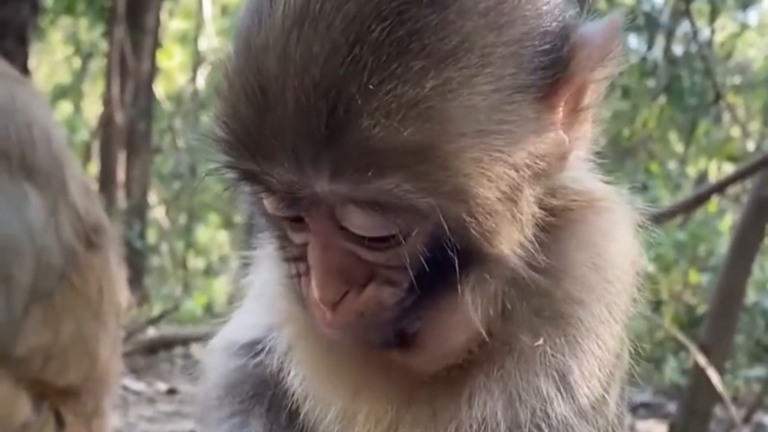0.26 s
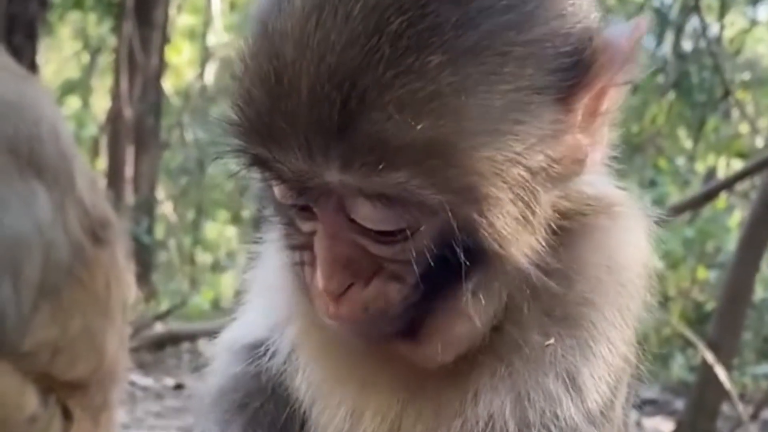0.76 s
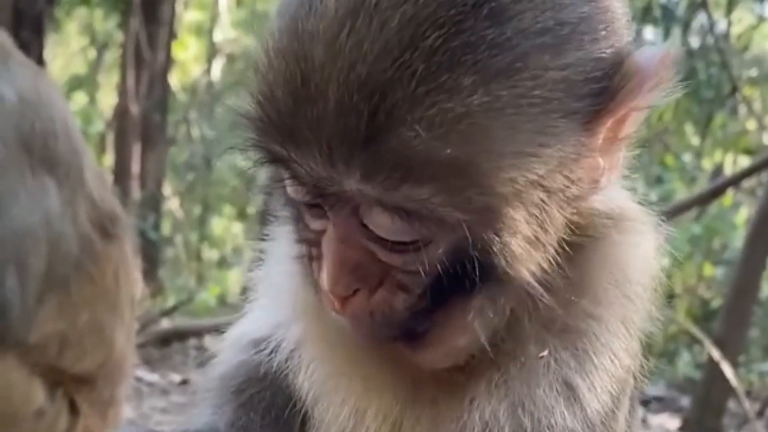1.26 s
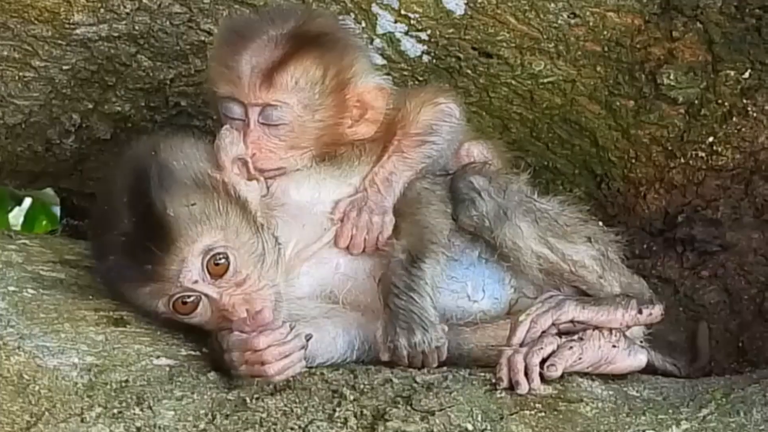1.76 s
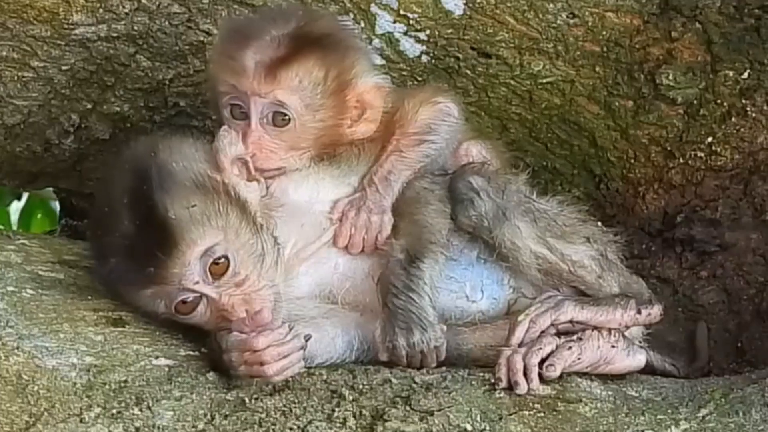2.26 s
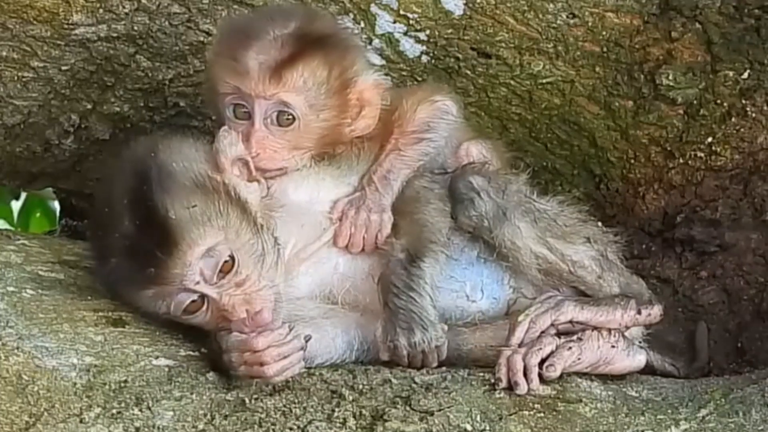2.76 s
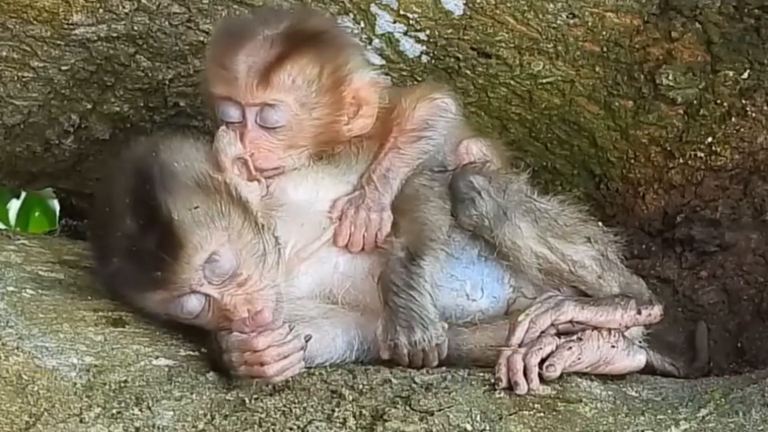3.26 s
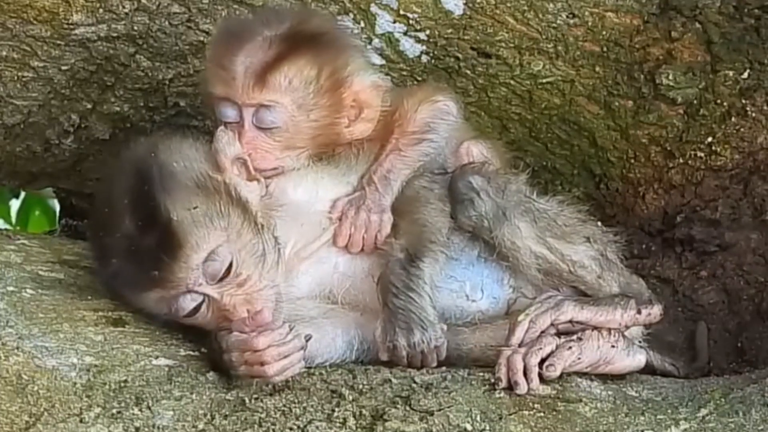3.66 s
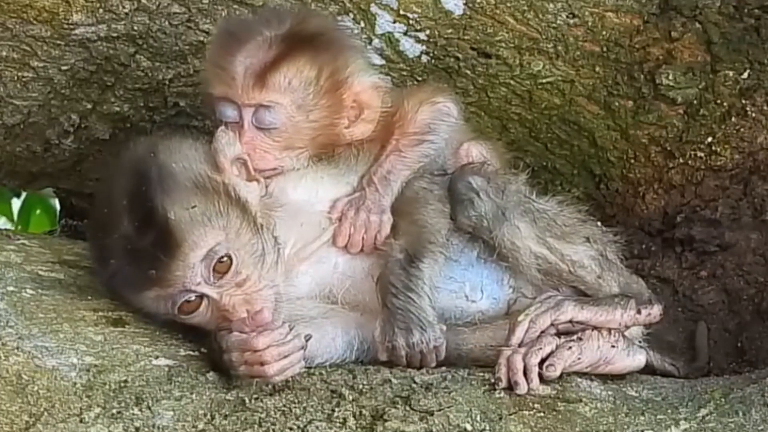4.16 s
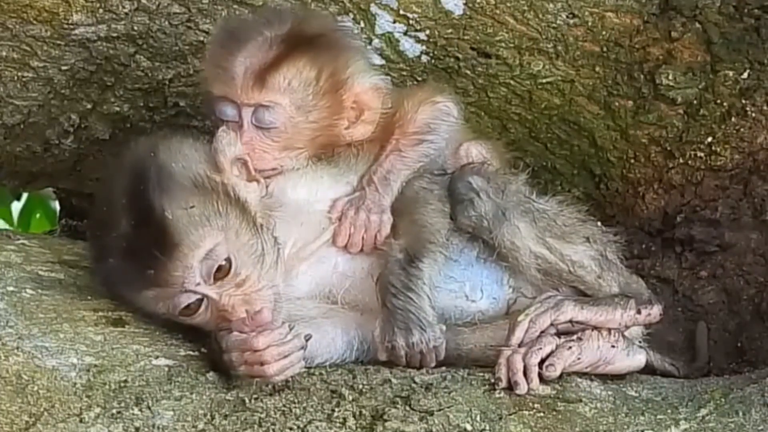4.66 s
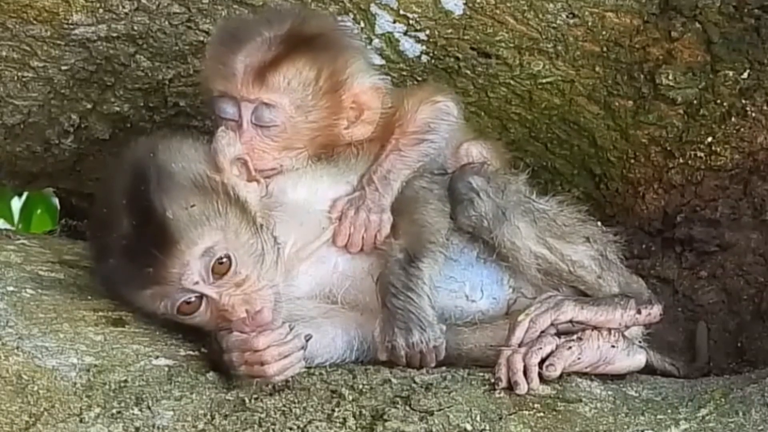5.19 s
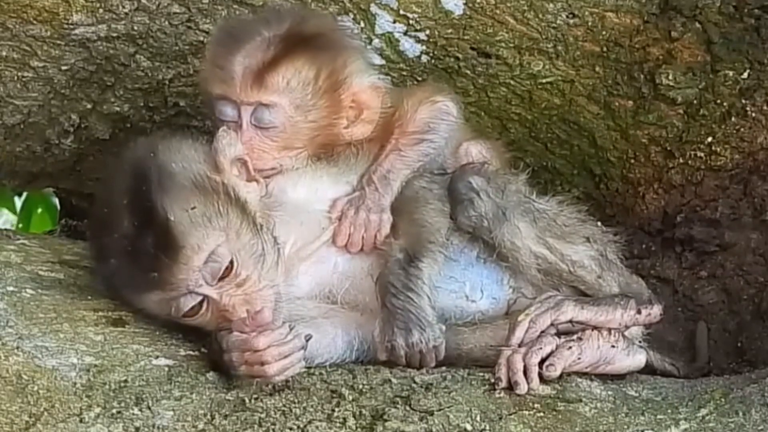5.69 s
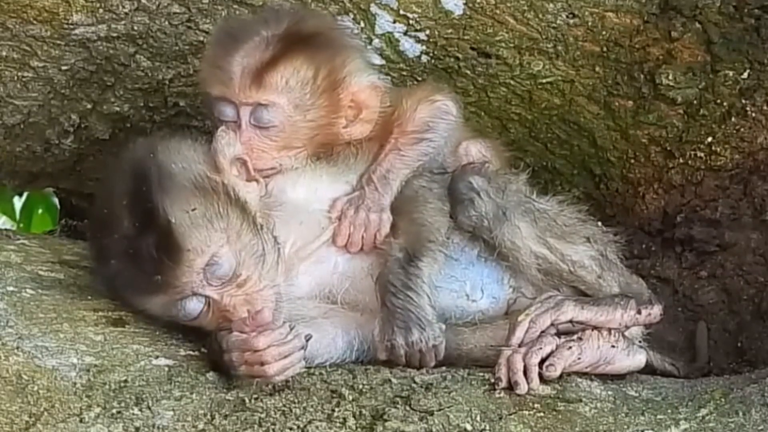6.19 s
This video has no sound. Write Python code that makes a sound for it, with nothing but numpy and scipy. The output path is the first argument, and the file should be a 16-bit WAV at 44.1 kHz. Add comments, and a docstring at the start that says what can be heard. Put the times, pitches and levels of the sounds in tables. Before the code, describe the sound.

Outdoors, piercing baby-monkey chatter comes in five bursts, most ending in a cracked, sinking squeal and a soft huff, with brief echoes.

```python
"""Among trees and rocks a young monkey calls close by: a cry, then five runs of shrill pips.
The first four runs rise into another falling, fluttering cry; cries crack and end in a soft huff.
The voice is a stack of harmonics from unsteady vocal folds, coloured by throat and mouth; huffs are
shaped noise. Noise echoes ring briefly, and low rumble swells around the calls. Underneath: a two-tone
far engine, noise rustle and hiss, a shrill wash, one faint falling whistle, a tick, a bump and a scuff."""
import sys
import numpy as np
from scipy import signal
from scipy.fft import rfft, irfft
from scipy.io import wavfile
from scipy.ndimage import uniform_filter1d, minimum_filter1d, map_coordinates

SR = 44100
rng = np.random.default_rng(int(sys.argv[2]) if len(sys.argv) > 2 else 0)


def waveform_to_disk(signal):
    """Save audio, clipped to [-1, 1], as 16-bit WAV at the path in sys.argv[1]."""
    frames = np.transpose(np.atleast_2d(signal))
    scaled = np.clip(frames, -1, 1) * 32767
    samples = np.round(scaled).astype(np.int16)
    wavfile.write(sys.argv[1], SR, samples)


N = 283563
TIME = np.arange(N) / SR
TOP_HZ = 16200  # upper edge of the voice and of the recorder

# bell-shaped swells of low rumble around the calls: (time [s], half width [s], level [dB])
RUMBLE_SWELLS = [(.07, .03, -40.5), (1.05, 0.13, -33), (2.63, 0.21, -35.5), (3.74, 0.058, -35.5),
                 (3.98, 0.24, -33.5), (4.38, .08, -43), (4.93, 0.11, -39), (5.66, 0.3, -43),
                 (6.37, 0.097, -40.5)]
# colour of that rumble: (frequency [Hz], level [dB])
RUMBLE_COLOUR = [(10, -28.5), (20, 6), (35, -9), (55, -13), (90, -26), (200, -34), (500, -78)]
# held levels of the surroundings:
# (start [s], low rustle [dB], high hiss [dB], echo send [dB], low rumble [dB])
BACKGROUND_LEVELS = [(0, -63, -62, 0, -52), (1.771, -58.5, -54, 0, -51.5), (3.62, -54.5, -53.5, 4, -45.5),
                     (4.85, -55.5, -53.5, 8.5, -49.5), (5.9, -56.5, -54, 2.5, -48)]
# bell-shaped swells of low rustle: (time [s], half width [s], level [dB])
RUSTLE_SWELLS = [(1.15, .09, -51), (4.0, 0.12, -44.5), (4.64, 0.17, -48)]
# colours of rustle and hiss: (frequency [Hz], level [dB])
RUSTLE_COLOUR = [(60, -0.5), (150, -1.5), (300, -1), (700, 0), (1100, -2), (1700, -14.5), (3000, -11),
                 (6000, -76.5)]
HISS_COLOUR = [(800, 0), (2000, 6.5), (2800, 5.5), (4500, 3), (6500, 4.5), (9000, -3), (12000, -6.5),
               (16000, -10.5)]
# far engine: (time [s], firing rate [Hz], level [dB])
ENGINE_CURVE = [(0.05, 100, -58), (.55, 98.3, -50), (.9, 89, -53.5), (1.7, 99, -51.5), (2.45, 98.5, -51.5),
                (3.6, 89.3, -49), (3.95, 88, -66), (4.75, 92, -70), (4.95, 99, -51), (5.6, 108, -66)]
# throat colour: (frequency [Hz], level [dB])
THROAT_COLOUR = [(700, 1.5), (1500, 2), (2250, 0.5), (2550, 2.5), (2800, 4), (3400, 15.5), (4200, 4),
                 (5500, 6), (6300, 2), (7500, 7.5), (10000, 1), (11500, -2), (13000, -8), (16000, -31)]
# colour of the snap that starts a note: (frequency [Hz], level [dB])
SNAP_COLOUR = [(300, -28.5), (750, 8), (1700, -36.5), (2500, -7.5), (3200, 8.5), (4300, -13), (7300, 12),
               (10000, 1), (16000, -31)]
# colour of air rushing through the mouth: (frequency [Hz], level [dB])
BREATH_COLOUR = [(100, 18), (300, 2.5), (750, 10), (1100, 3), (1800, -1.5), (3300, 10), (4600, -12),
                 (7500, 0.5), (11000, 14), (16000, -45)]
# long cries that hold their pitch, then sink and flutter:
# (time [s], length [s], held pitch [Hz], hold [s], last pitch [Hz], sinking time [s], level [dB],
#  mouth resonance [Hz], brightness [dB], fundamental [dB], flutter [0-1], flutter rate [Hz])
CRY_NOTES = [(0.0, 0.042, 2834, 0.00068, 2734, 0.031, -13, 7450, -7, -3, 0.78, 145.6),
             (1.116, 0.088, 2844, 0.0046, 2600, 0.084, -14.5, 7160, -4, -4, 0.68, 143.5),
             (2.717, 0.11, 2847, .042, 2665, 0.0095, -8, 7230, -2, -5, 0.42, 195),
             (4.066, .179, 2549, .095, 2180, .034, -20, 8950, 4.5, 2.5, .12, 142.7),
             (5.587, 0.12, 2312, 0.018, 2250, 0.015, -21.5, 8440, -0.5, -1, .05, 146)]
# cracks that end the cries: (time [s], pitch [Hz], level [dB], hoarseness [0-1])
CRACK_NOTES = [(.042, 3470, -13.5, 0.19), (1.199, 3263, -12.5, 0), (2.828, 3320, -10.5, 0.02),
               (4.248, 2214, -22.5, 0.83), (5.709, 2794, -20.5, 0.15)]
# soft huffs: (time [s], decay [s], level [dB])
HUFF_PUFFS = [(.054, 0.017, -29), (1.212, 0.018, -30), (2.351, 0.012, -34.5), (2.839, 0.025, -33.5),
              (3.925, 0.03, -35), (3.985, 0.073, -46), (4.257, 0.027, -46), (5.716, 0.0093, -26.5)]
# huff colour: (frequency [Hz], level [dB])
HUFF_COLOUR = [(150, -32.5), (480, -16.5), (640, 4.5), (820, -7.5), (1080, -4), (1500, -20.5), (3500, -17),
               (8000, -18.5), (15000, -33)]
# bell-shaped swells of a shrill wash from the trees: (time [s], half width [s], level [dB])
WASH_SWELLS = [(.42, 0.23, -58.5), (1.55, 0.21, -59)]
# short pips: (time [s], length [s], pitch [Hz], level [dB], hoarseness [0-1])
PIP_NOTES = [ (0.619, 0.023, 2490, -32.5, 0.12), (.679, 0.019, 2650, -28, 0.08),
             (0.744, 0.018, 2707, -20, 0), (.802, 0.018, 2658, -15, 0), (.862, .017, 2692, -14, 0),
             (0.92, 0.017, 2790, -13, 0.01), (0.976, 0.017, 2833, -11.5, 0), (1.031, .019, 2826, -13, 0.08),
             (1.082, .019, 2800, -10, 0.08), (2.157, 0.012, 2190, -35.5, 0.67),
             (2.216, 0.018, 2480, -27.5, 0.16), (2.281, 0.018, 2270, -21.5, 0.15),
             (2.407, .021, 2466, -17.5, 0.07), (2.465, 0.018, 2480, -13.5, 0),
             (2.52, .018, 2590, -10.5, .1), (2.58, .017, 2660, -10.5, 0.08), (2.632, 0.019, 2794, -7, 0.02),
             (2.683, 0.015, 2695, -7, 0.16), (3.669, 0.019, 1383, -23.5, 0.63),
             (3.728, 0.016, 1935, -24.5, 0.47), (3.797, 0.011, 1978, -23, 0.42),
             (3.847, 0.021, 2295, -16.5, 0.05), (3.908, 0.012, 2360, -8, 0),
             (3.956, 0.023, 2452, -17.5, 0.1), (4.004, .021, 2443, -19.5, .02),
             (4.032, 0.022, 2490, -19, 0.06), (4.056, 0.0113, 2530, -22.5, 0.42),
             (4.968, 0.015, 1980, -47.5, 1), (5.037, 0.032, 2150, -44.5, 0.15),
             (5.094, .022, 1956, -35, 0.65), (5.156, 0.022, 1706, -36, 0.9),
             (5.212, 0.025, 2120, -34.5, .75), (5.267, 0.026, 2154, -33, 0.8),
             (5.322, 0.02, 2280, -31.5, 0.6), (5.379, 0.0193, 2305, -30, 0.65),
             (5.422, 0.022, 2300, -32, 0.48), (5.461, .027, 2264, -30, 0.27),
             (5.508, 0.0237, 2300, -24.5, 0.23), (5.549, 0.026, 2266, -22, 0.22),
             (6.003, 0.029, 2480, -37.5, 0.37), (6.072, 0.021, 2433, -24, .6),
             (6.128, 0.021, 2517, -21, 0.26), (6.186, 0.018, 2600, -19, 0.14),
             (6.242, 0.023, 2612, -18, 0.15), (6.301, .023, 2655, -20, 0.15),
             (6.355, .024, 2715, -18.5, 0.14), (6.404, 0.017, 2688, -5, 0.15)]
# runs of pips, with pairs from the run's start to its end, or to the open mouth:
# (start [s], opening time [s], mouth resonance pair [Hz], brightness pair [dB],
#  pitch glide pair [share], fundamental [dB], flutter added at the last pip [0-1])
PIP_RUNS = [(0.61, 0.32, (3130, 6520), (2.8, 0), (-0.049, 0.0), -0.5, 0.67), (2.17, 0.17, (4900, 6970),
            (2.7, 2.9), (-0.033, 0.077), -5, .02), (3.66, 0.28, (3800, 7500), (-3.5, 3.8), (-0.018, 0.013),
            1, 0.1), (5.08, 0.29, (2600, 5960), (-36, 6.8), (0.026, -.005), -2, 0.1),
            (6.0, 0.19, (2250, 6860), (-15, -3), (-0.056, 0.013), -3.5, 0)]
# colours of wash, tick, scuff and the two parts of the echo: (frequency [Hz], level [dB])
WASH_COLOUR = [(1800, -48.0), (2600, -19), (3100, -1), (3900, -4.5), (4600, -35.5), (6000, -46.5)]
TICK_COLOUR = [(100, -8), (1000, 3), (5000, -15), (16000, -33)]
SCUFF_COLOUR = [(120, -25), (300, -7.5), (550, -4), (1200, -30), (8000, -27), (16000, -32)]
ECHO_MID_COLOUR = [(200, -29.5), (3000, -8.5), (6000, -5.5), (8500, -5.5), (12000, -4.5), (16000, -58.5)]
ECHO_SIDE_COLOUR = [(200, 0.5), (3000, -36.5), (8500, -32.5), (12500, 5), (16000, 57)]

SCOOP, SCOOP_S = 0.03, 0.009  # a cry starts this share flat and slides up
MOUTH_FOLLOW, FLUTTER_ONSET_S = 1.37, 0.0037  # the mouth closes as a power of the sinking pitch
CRACK_S, CRACK_GLIDE, CRACK_MOUTH_HZ, CRACK_BRIGHT_DB, CRACK_FLUTTER = 0.0092, 0.068, 6500, 5.5, 0.42
STEADY_FLUTTER, FLUTTER_RISE_S = 0.098, 0.04  # extra flutter gathers towards a run's last pip
WHISTLE_AT_S, WHISTLE_HALF_S, WHISTLE_DB = 1.55, 0.18, -60  # centre, half width, level before wobble
WHISTLE_HZ, WHISTLE_FALL_HZ_PER_S = 2300, 3200  # pitch at the centre, and its fall


def undb(db):
    """Decibels to gain."""
    return 10 ** (np.asarray(db) / 20)


def between(pair, share):
    """The value a share of the way from the first of a pair to the second."""
    return pair[0] + share * (pair[1] - pair[0])


def colour_db(points, hz):
    """A spectrum read on a log-frequency axis."""
    f, db = np.transpose(points)
    return np.interp(np.log(np.maximum(hz, 1)), np.log(f), db)


def noise(points, size=N):
    """Noise of rms 1 with the given colour."""
    gain = undb(colour_db(points, np.fft.rfftfreq(size, 1 / SR)))
    y = irfft(rfft(rng.standard_normal(size)) * gain, size)
    return y / y.std()


def walk(rate, size=N):
    """Smooth chance, with the given number of random knots a second."""
    knots = rng.standard_normal(int(size / SR * rate) + 4)
    return map_coordinates(knots, [np.arange(size) * rate / SR + 1], order=2)


def add(track, s, sound):
    """Mix a sound into a track at time s."""
    i = max(int(s * SR), 0)
    track[i:i + len(sound)] += sound[:max(N - i, 0)]


def swells(table):
    """The gain of bell-shaped swells, summed by power."""
    power = 0
    for s, half, db in table:
        power = power + (undb(db) * np.exp(-((TIME - s) / half) ** 2)) ** 2
    return np.sqrt(power)


def background_levels(blend_s=0.15):
    """Rustle, hiss, echo and rumble levels in dB, each held through its stretch and blended into the next."""
    starts, *columns = np.transpose(BACKGROUND_LEVELS)
    stretch = np.searchsorted(starts[1:], TIME)
    return [uniform_filter1d(c[stretch], int(blend_s * SR) + 1) for c in columns]


def rumble():
    """Low coloured noise: a steady low rumble and its swells add by power."""
    *_, calm_db = background_levels()
    return np.hypot(undb(calm_db), swells(RUMBLE_SWELLS)) * noise(RUMBLE_COLOUR + [(2000, -73)])


def outdoors(side=0.2, crackle_db=2.0, grain_db=3):
    """An uneven low rustle with grainy swells and a smooth high hiss, nearly the same on both sides."""
    low_db, high_db, *_ = background_levels()
    grainy = swells(RUSTLE_SWELLS) * undb(grain_db * walk(90))
    low = np.hypot(undb(low_db), grainy) * undb(2.0 * walk(25) + crackle_db * walk(250))
    high = undb(high_db + 0.8 * walk(20))
    mid, wide = (low * noise(RUSTLE_COLOUR) + high * noise(HISS_COLOUR) for _ in range(2))
    return mid + side * wide * np.array([[1], [-1]])


def engine(octave_db=-24):
    """A far engine hums at its firing rate, with a weak octave above."""
    s, rate_hz, level_db = np.transpose(ENGINE_CURVE)
    hz, db = np.interp(TIME, s, rate_hz), np.interp(TIME, s, level_db)
    phase = 2 * np.pi * np.cumsum(hz) / SR
    return undb(db) * np.sqrt(2) * (np.sin(phase) + undb(octave_db) * np.sin(2 * phase))


def tract_db(f, mouth_hz, bright_db, mouth_db=12, mouth_width=1400,
             notch_db=-5, notch_ratio=0.59, notch_width=600):
    """Throat colour, the mouth's moving resonance with a notch below, and a treble lift or cut for effort."""
    mouth = mouth_db * np.exp(-((f - mouth_hz) / mouth_width) ** 2)
    notch = notch_db * np.exp(-((f - notch_ratio * mouth_hz) / notch_width) ** 2)
    return colour_db(THROAT_COLOUR, f) + mouth + notch + bright_db * np.clip((f - 8000) / 1800, 0, 1)


def voice(hz, mouth_hz, bright_db, base_db, hoarse, flutter, flutter_hz=144, flutter_bend=0.044,
          flutter_depth=0.92, purr_db=-27, jitter=0.005, hoarse_jitter=0.022, rasp=0.69,
          shimmer_db=2.5, wander=0.017):
    """Vocal folds sung through throat and mouth, rms about 1; hoarse folds add half-harmonics and rasp."""
    size = len(hz)
    # a slow second vibration bends and chokes the shrill one, and purrs faintly itself
    beat = 2 * np.pi * np.cumsum(flutter_hz * (1 + 0.083 * walk(83, size))) / SR
    bend = flutter_bend * flutter * (np.sin(beat) + 0.5 * walk(500, size))
    hz = hz * (1 + bend + (0.0067 + wander * hoarse) * walk(130, size))
    rough_hz = hz * (1 + (jitter + hoarse_jitter * hoarse) * walk(2500, size))
    phase = 2 * np.pi * np.cumsum(rough_hz) / SR

    k = np.arange(1, 23)[:, None] / 2  # harmonics 0.5 to 11 in half steps
    shimmer = shimmer_db * np.array([walk(160, size) for _ in k])
    gain = undb(tract_db(k * hz, mouth_hz, bright_db) + base_db * (k == 1) + shimmer)
    half_gain = np.clip(0.89 * hoarse - 0.1, 0, 1)
    gain = gain * np.where(k % 1, half_gain, 1) * (k * hz < TOP_HZ)
    partials = gain * np.sin(k * phase + rng.uniform(0, 2 * np.pi, k.shape))
    tone = np.sum(partials, 0) / np.sqrt(np.sum(gain ** 2, 0) / 2)

    # turbulence passes through the same mouth
    f = np.geomspace(200, TOP_HZ, 60)
    turbulence = noise(np.c_[f, tract_db(f, np.mean(mouth_hz), np.mean(bright_db))], size)
    share = np.clip(rasp * hoarse, 0, 1)
    tone = np.sqrt(1 - share ** 2) * tone + share * turbulence

    depth = np.clip(flutter_depth * flutter ** 2, 0, 1)
    choke = (1 + depth * np.cos(beat)) / np.sqrt(1 + depth ** 2 / 2)
    return tone * choke + undb(purr_db) * flutter * np.sin(beat)


def gate(t, length, attack_s=0.0014, release_s=0.004):
    """Opens abruptly, holds, and closes around the given length."""
    return np.clip(t / attack_s, 0, 1) * np.clip((length - t) / release_s + 0.5, 0, 1)


def creak(db, snap_db=-4, snap_s=0.0031, tick_db=-15, full_db=-12):
    """The folds snap into vibration after 8 ms; two ticks before it fade fast with falling effort."""
    t = np.arange(SR // 40) / SR
    lead_db = tick_db + 2 * min(db - full_db, 0)
    ticks = [(rng.uniform(0.002, 0.005), lead_db, snap_s / 2),
             (rng.uniform(0.005, 0.007), lead_db, snap_s / 2),
             (0.008, snap_db, snap_s)]
    push = sum(undb(size) * (t >= s) * np.exp(-abs(t - s) / decay) for s, size, decay in ticks)
    return undb(db) * push * noise(SNAP_COLOUR, len(t))


def cries(waver_db=0.5, waver_per_s=70, drift=0.004):
    """Each cry scoops up, holds, and sinks fluttering as the mouth closes; yields (s, length, dB, sound)."""
    for (s, length, held_hz, hold_s, last_hz, sink_s, db, mouth_hz,
         bright_db, base_db, full_flutter, flutter_hz) in CRY_NOTES:
        t = np.arange(int((length + 0.004) * SR)) / SR
        sinking = np.maximum(t - hold_s, 0)
        hz = last_hz + (held_hz - last_hz) * np.exp(-sinking / sink_s)
        hz = hz * (1 - SCOOP * np.exp(-t / SCOOP_S) + drift * walk(waver_per_s, len(t)))
        flutter = full_flutter * (1 - np.exp(-sinking / FLUTTER_ONSET_S))
        closing_hz = mouth_hz * (hz / held_hz) ** MOUTH_FOLLOW
        hoarse = 0.02 + 0.16 * flutter
        tone = voice(hz, closing_hz, bright_db, base_db, hoarse, flutter, flutter_hz)
        yield s, length, db, tone * undb(waver_db * walk(waver_per_s, len(t)))


def pip(length, hz, glide, mouth_hz, bright_db, hoarse, flutter, base_db=0, sag=0.016):
    """One short note whose pitch glides, then sags as the push runs out."""
    along = np.arange(int((length + 0.004) * SR)) / SR / length
    contour = 1 + glide * (along - 0.5) - sag * np.minimum(along, 1) ** 6
    return voice(hz * contour, mouth_hz, bright_db, base_db, hoarse, flutter)


def cracks():
    """The voice breaks for an instant as a cry ends; yields (s, length, dB, sound)."""
    for s, hz, db, hoarse in CRACK_NOTES:
        sound = pip(CRACK_S, hz, CRACK_GLIDE, CRACK_MOUTH_HZ, CRACK_BRIGHT_DB, hoarse, CRACK_FLUTTER)
        yield s, CRACK_S, db, sound


def huffs():
    """Short low puffs as the throat opens."""
    out, t = np.zeros(N), np.arange(SR // 4) / SR
    for s, decay, db in HUFF_PUFFS:
        puff = np.minimum(t / 0.0018, 1) * np.exp(-t / decay)
        add(out, s, undb(db) * puff * noise(HUFF_COLOUR, len(t)))
    return out


def wash():
    """A faint shrill wash from the trees: unsteady swells of narrow noise."""
    return swells(WASH_SWELLS) * undb(2 * walk(25)) * noise(WASH_COLOUR)


def pips():
    """Through a run the mouth moves, the glide shifts and flutter gathers; yields (s, length, dB, sound)."""
    ends = [run[0] for run in PIP_RUNS[1:]] + [np.inf]
    for settings, end in zip(PIP_RUNS, ends):
        start, open_s, mouth_hz, bright_db, glide, base_db, last_flutter = settings
        run = [row for row in PIP_NOTES if start - 0.2 < row[0] < end - 0.2]
        last = run[-1][0]
        for s, length, hz, db, hoarse in run:
            age = max(s - start, 0)
            opening, progress = min(age / open_s, 1), age / (last - start)
            flutter = STEADY_FLUTTER + last_flutter * np.exp((s - last) / FLUTTER_RISE_S)
            sound = pip(length, hz, between(glide, progress), between(mouth_hz, opening),
                        between(bright_db, opening), hoarse, flutter, base_db)
            yield s, length, db, sound


def monkey(air_db=-25, air_decay_s=0.016):
    """Cries, cracks and pips, each started by a creak and trailed by a rush of air."""
    out, effort = np.zeros(N), np.zeros(N)
    lead_s = 0.008  # so that the snap meets the note
    for s, length, db, sound in [*cries(), *cracks(), *pips()]:
        loud = undb(db) * gate(np.arange(len(sound)) / SR, length)
        add(out, s, loud * sound)
        add(out, s - lead_s, creak(db))
        add(effort, s, loud)
    keep = np.exp(-1 / (air_decay_s * SR))
    breath = signal.lfilter([1 - keep], [1, -keep], effort)
    return out + undb(air_db) * breath * noise(BREATH_COLOUR)


def knocks(tick_db=-16, thump_db=-27, thump_hz=70, scuff_db=-45):
    """A sharp noise tick, a soft low bump and a faint noise scuff."""
    out, t = np.zeros(N), np.arange(SR // 10) / SR
    tick = np.exp(-t / 0.001) * noise(TICK_COLOUR, len(t))
    thump = np.exp(-((t - 0.028) / 0.0095) ** 2) * np.sin(2 * np.pi * thump_hz * t)
    scuff = np.exp(-((t - 0.032) / 0.018) ** 2) * noise(SCUFF_COLOUR, len(t))
    add(out, 0.9165, undb(tick_db) * tick)
    add(out, 3.695, undb(thump_db) * thump)
    add(out, 5.85, undb(scuff_db) * scuff)
    return out


def whistle():
    """A distant whistle falls steadily, its pitch and level smeared by the trees."""
    hz = WHISTLE_HZ - WHISTLE_FALL_HZ_PER_S * (TIME - WHISTLE_AT_S)
    loud = swells([(WHISTLE_AT_S, WHISTLE_HALF_S, WHISTLE_DB)]) * (1 + 0.47 * walk(80))
    return loud * np.sin(2 * np.pi * np.cumsum(hz * (1 + 0.0099 * walk(400))) / SR)


def surroundings(x, near_db=-19, near_t60=0.24, far_db=-25, far_t60=0.51, gap_s=0.011, side_db=-20):
    """Ground and rock answer soon, with a longer, fainter noise tail;
    a different noise is added oppositely left and right."""
    t = np.arange(int(0.8 * SR)) / SR
    power = 0
    for db, t60 in ((near_db, near_t60), (far_db, far_t60)):
        # each decay is scaled to a fixed total energy
        power = power + undb(db) ** 2 * undb(-120 * t / t60) * np.log(10 ** 6) / (t60 * SR)
    tail = np.sqrt(power) * (t > gap_s)
    sent = x * undb(background_levels()[2])
    mid, wide = (signal.fftconvolve(sent, tail * noise(colour, len(t)))[:N]
                 for colour in (ECHO_MID_COLOUR, ECHO_SIDE_COLOUR))
    return x + mid + undb(side_db) * wide * np.array([[1], [-1]])


def treble_width(x, skew=0.0037):
    """A slight treble difference between left and right."""
    return x + skew * np.gradient(x, axis=1) * np.array([[1], [-1]])


def scene():
    """The monkey, the knocks and their echoes over the outdoor background."""
    close = treble_width(surroundings(monkey() + huffs() + knocks()))
    distance = engine() + wash() + whistle()
    return close + outdoors() + distance + rumble()


def record(dry, ceiling=0.42, hold_s=0.0023):
    """A quick limiter holds the loudest peaks down; the recorder cuts the top."""
    hold = int(hold_s * SR) + 1
    room = ceiling / np.maximum(abs(dry).max(0), ceiling)
    gain = uniform_filter1d(minimum_filter1d(room, hold), hold)
    top_cut = signal.ellip(8, 0.2, 70, TOP_HZ, fs=SR, output="sos")
    return signal.sosfilt(top_cut, dry * gain)


dry = scene()
out = record(dry)
waveform_to_disk(out)
```